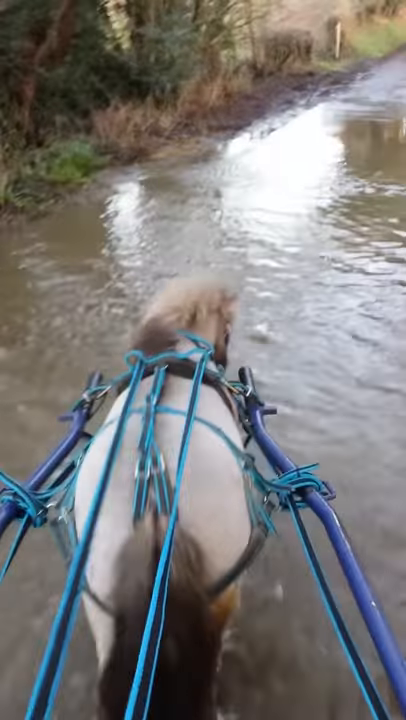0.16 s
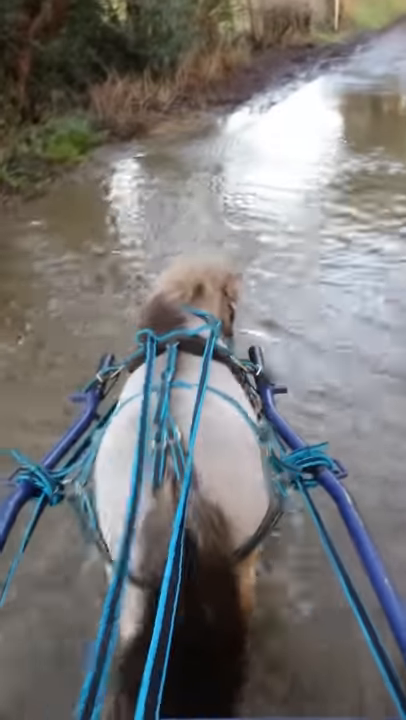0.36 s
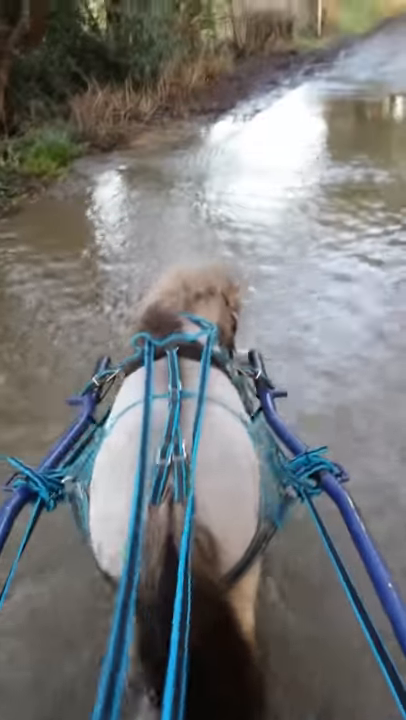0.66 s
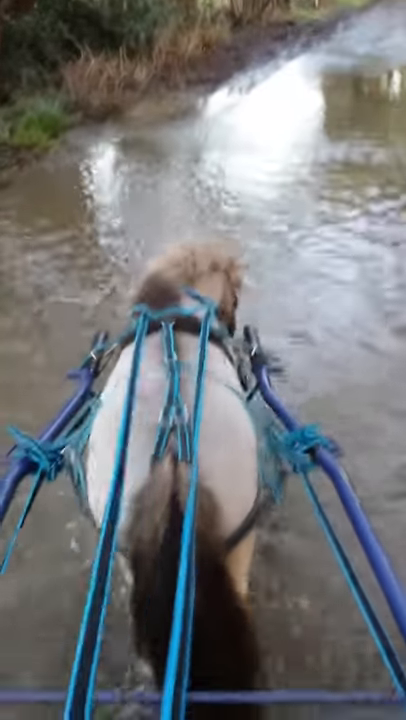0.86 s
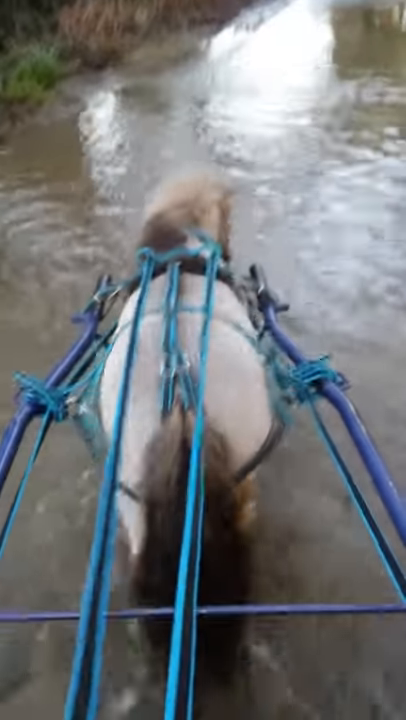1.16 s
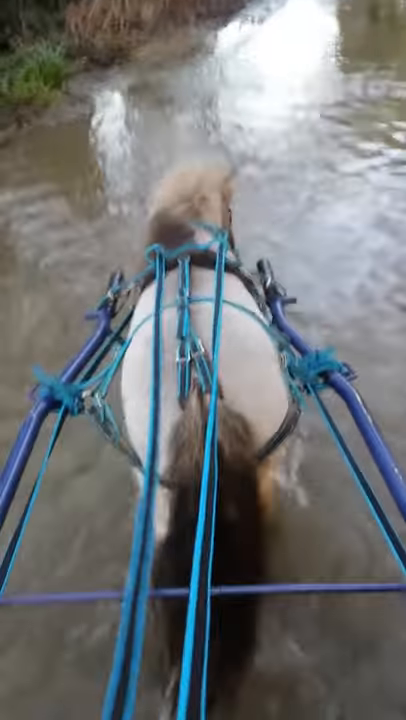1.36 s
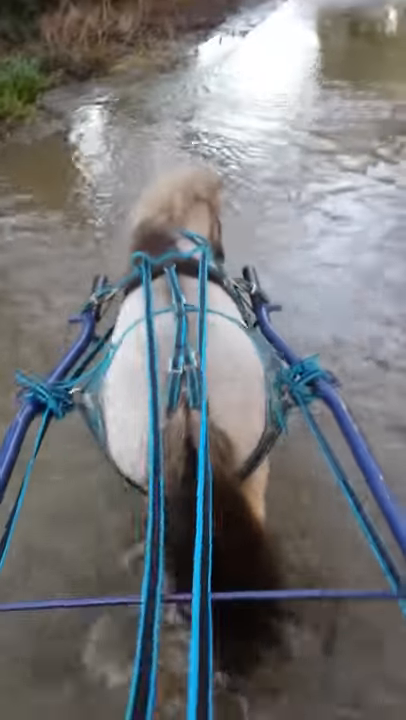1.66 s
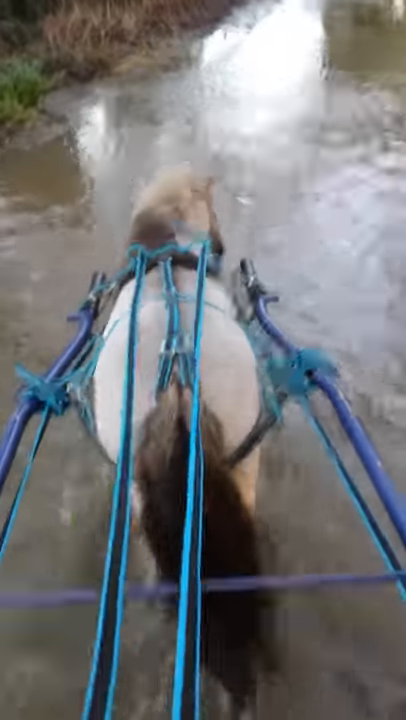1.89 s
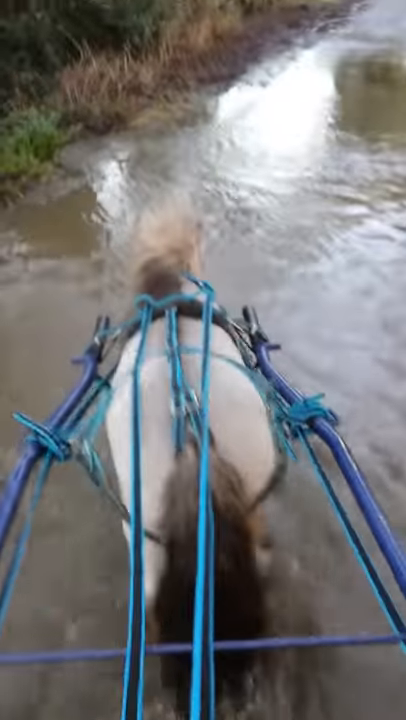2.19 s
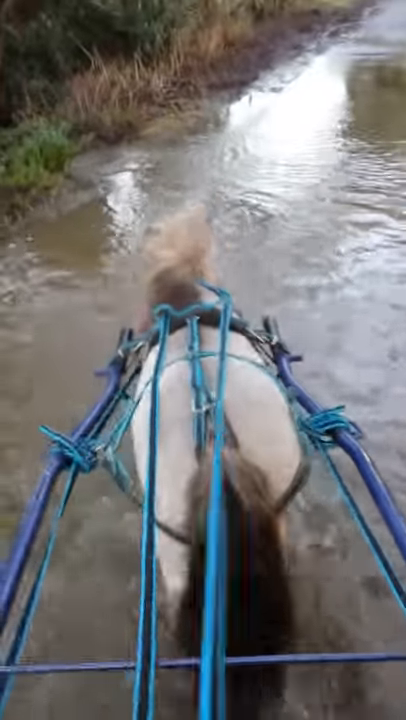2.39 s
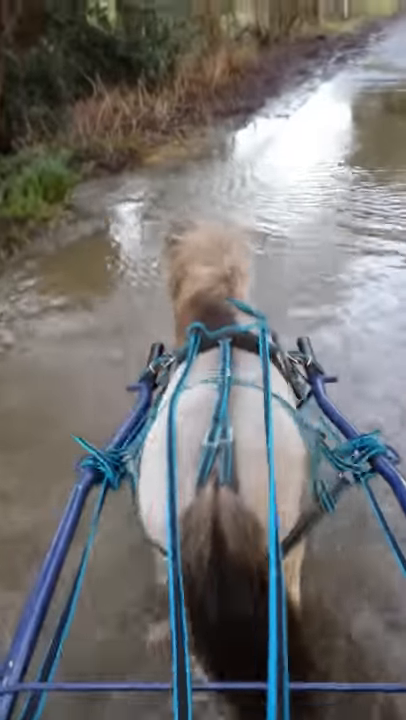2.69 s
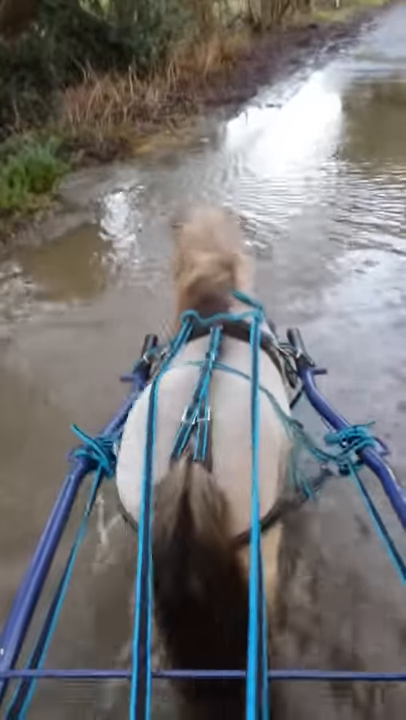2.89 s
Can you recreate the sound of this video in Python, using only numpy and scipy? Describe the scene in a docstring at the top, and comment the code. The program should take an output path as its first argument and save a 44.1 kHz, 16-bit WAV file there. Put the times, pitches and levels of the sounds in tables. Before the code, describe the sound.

Splashing steps of a pony wading through flood water, over steady fizzing wake and wind buffets

```python
"""Pony cart through flood water

A pony trots through flood water pulling a cart, heard from the seat on a phone with two microphones.
Each step throws a splash of lumpy noise and bubbles over the steady fizz of the wake.
Sliding, dying tones make the glugs, thuds and droplets; short noise bursts make the slaps of water.
Filtered noise and deep single swings are the wind, which buffets the right microphone in growing gusts."""
import sys
import numpy as np
from scipy import signal
from scipy.fft import rfft, irfft
from scipy.io import wavfile
from scipy.ndimage import uniform_filter1d

SR = 44100
rng = np.random.default_rng(int(sys.argv[2]) if len(sys.argv) > 2 else 0)


def magnitude_from_level(level_db):
    """Linear magnitude for a level in decibels (20 dB per decade)."""
    exponent = np.asarray(level_db, float) / 20
    return 10 ** exponent


def digitize_waveform(pressure):
    """Quantize a signal to 16-bit integers and store it at the path in sys.argv[1].

    Rows of a 2-D input are taken as channels; values are limited to [-1, 1].
    """
    field = np.atleast_2d(pressure).T
    bounded = np.clip(field, -1, 1)
    quanta = np.round(bounded * 32767).astype(np.int16)
    wavfile.write(sys.argv[1], SR, quanta)


N = 134064  # length in samples

# Colour of the wake's fizz. Each row: frequency in Hz, relative level in dB.
WAKE_COLOUR = [(24, -35), (40, -6.5), (209, 1.5), (416, -18.5), (698, -5), (2450, -9), (3220, -7),
               (5540, -10), (7440, -9), (11900, -27.5), (14500, -41.5)]
# Stereo width of all the noise made by noise(). Each row: frequency in Hz, left-right likeness (1 = same).
STEREO_LIKENESS = [(180, 1), (530, 0.86), (1200, 0.47), (4710, 0.047), (14000, 0.04)]
# Wind rumble on the right port. Each row: time in seconds, level in dB.
WIND_LEVEL = [(1.3, -39), (1.78, -36.5), (1.87, -29.5), (2.14, -33), (2.25, -27.5), (2.41, -31),
              (2.5, -21.5), (2.68, -16.5), (2.78, -25), (2.86, -37)]
# Colour of the wind rumble. Each row: frequency in Hz, relative level in dB.
WIND_COLOUR = [(20, -37), (40, -1), (70, 1.5), (130, -2), (250, -10.5), (400, -14), (1100, -86)]
# Splash of each step. Each row: start in seconds, strength in dB, brightness in dB, fade length in seconds.
STEPS = [(-.002, -28, -4, 0.11), (0.204, -28, 3, 0.11), (0.487, -28, -9, 0.078), (0.684, -30.5, 3, 0.15),
         (0.97, -29, -3.5, 0.079), (1.188, -31.5, 2.5, 0.15), (1.474, -30.5, 0, 0.085),
         (1.694, -26, 2, 0.1), (1.971, -30, -2, 0.069), (2.21, -26.5, -4.5, 0.12), (2.501, -29.5, -2, 0.11),
         (2.62, -30.5, -2, 0.11), (2.708, -27, -3, 0.14), (2.978, -29, -4, 0.2)]
# Colour of the splashes. Each row: frequency in Hz, relative level in dB.
SPLASH_COLOUR = [(150, -5), (350, -9), (650, -4), (1000, -4), (1600, -9), (3500, -16), (7000, -4.5),
                 (10000, -17.5), (15000, -87)]
# Air pockets closing in the water. Each row: time in seconds, peak in dB, pitch in Hz.
GLUGS = [(.004, -24.5, 584), (.017, -19.5, 723), (0.048, -19.5, 574), (0.11, -21, 1130), (0.237, -12, 662),
         (0.292, -19, 578), (0.495, -22.5, 560), (0.532, -27, 545), (0.558, -23, 545), (0.696, -24, 1200),
         (0.725, -19, 620), (.748, -22.5, 840), (0.762, -19.5, 603), (.771, -22.5, 730), (.785, -25, 744),
         (.912, -24, 1430), (1.192, -20.5, 1340), (1.239, -22.5, 742), (1.245, -10.5, 689),
         (1.261, -26, 716), (1.285, -17.5, 730), (1.494, -24.5, 760), (1.719, -20.5, 780),
         (1.731, -15.5, 705), (1.767, -24, 746), (2.215, -23.5, 1210), (2.248, -23, 934), (2.291, -24, 810),
         (2.299, -17.5, 704), (2.514, -22.5, 995), (2.629, -22, 570), (2.745, -19.5, 735),
         (2.804, -21.5, 736), (2.82, -24, 920), (2.993, -22, 1290), (3.0098, -17.5, 943),
         (3.031, -19.5, 726)]
# Thuds of the legs. Each row: time in seconds, peak in dB, pitch in Hz, decay scale in cycles.
THUDS = [(0.056, -14, 216, 2.6), (0.289, -26, 211, 5.3), (0.494, -18.5, 318, 2.8), (0.562, -22.5, 212, 2.2),
         (1.043, -27, 236, 6.5), (1.567, -21, 201, 6.2), (1.774, -20, 235, 3.7), (1.997, -16, 236, 1.33),
         (2.295, -25, 254, 2.6), (2.627, -20, 255, 3.3)]
# Water slapping water. Each row: start in seconds, peak of the crack in dB, centre frequency in Hz.
SLAPS = [(.213, -11, 4000), (.991, -12, 700), (1.2039, -7, 3200), (1.701, -15, 1700), (2.216, -10, 1400),
         (2.628, -18, 1190), (2.71, -11, 2770), (2.7305, -7.5, 2900)]
# Ringing droplets. Each row: time in seconds, cluster level in dB, middle pitch in Hz.
DROPLETS = [(1.164, -14, 4100), (1.181, -16, 7600), (1.203, -12.5, 3780), (1.222, -22, 7060),
            (1.274, -15, 4280), (1.6036, -15, 7060), (1.7853, -8, 6240), (2.788, -23, 2500)]
# Single wind buffets on the right port. Each row: time in seconds, peak in dB, pitch in Hz.
BUFFETS = [(1.466, -13.5, 81.5), (1.846, -9, 76), (1.883, -9.5, 97), (2.014, -14.5, 106),
           (2.219, -12.5, 129), (2.234, -11.5, 159), (2.259, -15, 144), (2.344, -4.5, 134),
           (2.371, -16, 74), (2.537, -7, 115), (2.645, -13, 74.5), (2.669, -12, 155), (2.739, -8, 170),
           (2.761, -4.5, 243)]
# Tonal balance of the two ports for the water. Each row: frequency in Hz, left minus right in dB.
PORT_BALANCE = [(200, 0), (370, 2), (800, -1.5), (1700, -1), (3300, 3), (6000, -4.5), (9200, -12),
                (14000, -25)]


def evened(x):
    """Scales a signal to an rms of 1."""
    return x / np.sqrt(np.mean(x ** 2) + 1e-20)


def read(points, hz):
    """Reads a frequency table at any frequency, on a logarithmic axis."""
    f, value = np.transpose(points)
    return np.interp(np.log(hz + 1), np.log(f + 1), value)


def curve(points):
    """Draws straight lines through (seconds, value) rows, one value per sample."""
    return np.interp(np.arange(N) / SR, *np.transpose(points))


def add(mix, s, sound):
    """Mixes a sound in at s seconds, trimming what falls outside."""
    start = round(s * SR)
    part = mix[max(start, 0):][:len(sound) + min(start, 0)]
    part += sound[max(-start, 0):][:len(part)]


def noise(colour, patchy_db, flicker_db):
    """Two-channel noise from random short-time spectra with patches and wide flicker, rms 1."""
    frames = N // 128 + 5
    hz = np.fft.rfftfreq(512, 1 / SR)
    a, b, c, d, patches = rng.standard_normal((frames, 257, 5)).T
    patches = uniform_filter1d(patches, size=8, axis=0)  # smooth across frequency
    patches = evened(uniform_filter1d(patches, size=6, axis=1))  # and across time
    flicker = evened(uniform_filter1d(rng.standard_normal(frames), size=3))
    same = np.clip(read(STEREO_LIKENESS, hz), -1, 1)[:, None]
    left = a + 1j * b
    right = same * left + np.sqrt(1 - same ** 2) * (c + 1j * d)
    level_db = read(colour, hz)[:, None] + patchy_db * patches + flicker_db * flicker
    spectra = np.array([left, right]) * magnitude_from_level(level_db)
    return evened(signal.istft(spectra, nperseg=512, noverlap=384)[1][:, :N])


def bubble(hz, cycles, glide, rise):
    """A swelling and dying tone, peak near 1, sliding up for a positive glide and down for a negative."""
    u = np.arange(0, 1.5 * cycles / hz, 1 / SR) * hz / cycles  # time in units of the decay scale
    shape = u / (u + rise) * np.exp(-1.2 * u) * (1 - (u / u[-1]) ** 2)
    phase = cycles * (u + glide * (u ** 2 / 2 - u / 2))  # in turns
    return shape / shape.max() * np.sin(2 * np.pi * phase)


def swarm(per_s, lo_hz, hi_hz, cycles, spread_db, width):
    """Random bubbles of 24 sizes, so 24 pitches, scattered left and right."""
    out = np.zeros((2, N))
    for hz in np.geomspace(lo_hz, hi_hz, num=24):
        draw = rng.random((2, N))
        size = np.minimum(rng.exponential(1, N), 4)
        train = (draw[0] < per_s / 24 / SR) * magnitude_from_level(spread_db * size)
        side = width * (2 * draw[1] - 1)
        panned = train * np.array([1 + side, 1 - side])
        out += signal.oaconvolve(panned, bubble(hz, cycles, 0.037, 0.03)[None], axes=1)[:, :N]
    return out


def wake():
    """Wheels and legs stir a steady fizz: noise, fine spray and small bubbles."""
    fizz = magnitude_from_level(-31) * noise(WAKE_COLOUR, 1.56, 1.0)
    spray = magnitude_from_level(-52.0) * swarm(900, 2270, 10200, 2.7, 4.14, 0.99)
    gurgle = magnitude_from_level(-47.0) * swarm(130, 193.8, 1746, 10.5, 3.7, 0.58)
    return fizz + spray + gurgle


def wind_rumble():
    """Wind over the ports: low noise in slow lumps, nearly all on the right."""
    white = rng.standard_normal((2, N))
    lumps = uniform_filter1d(rng.standard_normal((2, N)), size=500)
    lumps = evened(uniform_filter1d(lumps, size=500))
    colour = magnitude_from_level(read(WIND_COLOUR, np.fft.rfftfreq(N, 1 / SR)))
    rumble = evened(irfft(rfft(white * magnitude_from_level(2.6 * lumps)) * colour, N))
    left_level = magnitude_from_level(-50.5) * np.ones(N)
    return rumble * np.array([left_level, magnitude_from_level(curve(WIND_LEVEL))])


def splashes():
    """Each step: a burst of lumpy noise that fades, the top sooner, with a swarm of bubbles inside."""
    rise_s, split_hz = 0.0074, 1500
    body, top = np.zeros((2, N))  # envelopes below and above the split
    for s, strength_db, bright_db, length in STEPS:
        t = np.arange(0, 1.4 * length, 1 / SR)
        rise = np.minimum(t / rise_s, 1)
        add(body, s, rise * magnitude_from_level(strength_db - 4 * (t / length) ** 3.8))
        add(top, s, rise * magnitude_from_level(strength_db + bright_db - 15 * t / length))
    water = noise(SPLASH_COLOUR, 3.6, 3.2)
    low = signal.sosfilt(signal.butter(4, split_hz, fs=SR, output="sos"), water)
    high = signal.sosfilt(signal.butter(4, split_hz, "high", fs=SR, output="sos"), water)
    large_bubbles = magnitude_from_level(-11) * swarm(300, 507, 1630, 5.1, 5.3, 0.37)
    small_bubbles = magnitude_from_level(-5.5) * swarm(1800, 2447, 9100, 5.0, 3.86, 1.0)
    return body * (low + large_bubbles) + top * (high + small_bubbles)


def glugs():
    """Single air pockets ring hollow; a smaller pocket rings along and beats with each."""
    cycles, partner_db = 6.14, -10
    out = np.zeros(N)
    for (s, db, hz), (late, size) in zip(GLUGS, rng.random((len(GLUGS), 2))):
        partner_hz = hz * (1.304 + 0.5 * size)
        add(out, s - 0.001, magnitude_from_level(db) * bubble(hz, cycles, 0.028, 0.073))
        add(out, s + 0.00315 * late, magnitude_from_level(db + partner_db) * bubble(partner_hz, cycles, 0.04, 0.19))
    return out


def thuds():
    """Deep thuds of the legs: low tones that die within a few cycles."""
    out = np.zeros(N)
    for s, db, hz, cycles in THUDS:
        add(out, s + 0.00148, magnitude_from_level(db) * bubble(hz, cycles, 0.033, 0.15))
    return out


def slaps():
    """Brief cracks two octaves wide with a longer puff of spray, partly alike in both ports."""
    crack_t60_s, spray_t60_s, spray_db = 0.009, 0.035, -11
    t = np.arange(0, spray_t60_s, 1 / SR)

    def puff(burst, band_hz, t60_s):
        """Dies away by 60 dB in t60_s and is band-passed to a peak of 1."""
        band = signal.butter(3, band_hz, "band", fs=SR, output="sos")
        x = signal.sosfilt(band, burst * magnitude_from_level(-60 * t / t60_s))
        return x / abs(x).max()

    out = np.zeros((2, N))
    for s, db, hz in SLAPS:
        left, right, both = rng.standard_normal((3, len(t)))
        burst = np.minimum(t / 0.00072, 1) * (np.array([left, right]) + 0.48 * both)
        crack = puff(burst, [hz / 2, hz * 2], crack_t60_s)
        spray = puff(burst, [4500, 8800], spray_t60_s)
        for channel, part in zip(out, crack + magnitude_from_level(spray_db) * spray):
            add(channel, s, magnitude_from_level(db) * part)
    return out


def droplets():
    """Clusters of three ringing droplets, close in time and pitch."""
    out = np.zeros(N)
    for (s, db, hz), draw in zip(DROPLETS, rng.random((len(DROPLETS), 3, 2))):
        for late, size in draw:
            ring = bubble(hz * (0.92 + 0.16 * size), 9.0, 0.1, 0.15)
            add(out, s + 14 * late / hz, magnitude_from_level(db - 3) * ring)  # up to 14 cycles late
    return out


def wind_buffets():
    """Single gusts punch the right port: deep swings that slide down and die at once."""
    out = np.zeros((2, N))
    for s, db, hz in BUFFETS:
        add(out[1], s + 0.0019, magnitude_from_level(db) * bubble(hz, 1.1, -0.84, 0.067))
    return out


def through_ports(water):
    """The two ports colour the water differently, and it reaches the right one slightly later."""
    right_lag_s = 7e-5
    hz = np.fft.rfftfreq(N, 1 / SR)
    tilt = read(PORT_BALANCE, hz) / 2  # half the difference up on the left, half down on the right
    lag = np.exp(-2j * np.pi * hz * right_lag_s)
    return irfft(rfft(water) * np.array([magnitude_from_level(tilt), lag * magnitude_from_level(-tilt)]), N)


def scene():
    """Water through both ports, with wind straight on the microphones."""
    pockets = glugs() + thuds() + droplets()  # the same in both channels
    water = wake() + splashes() + slaps() + pockets
    return through_ports(water) + wind_rumble() + wind_buffets()


def band_limit(x):
    """A steep low-pass at the top of the band."""
    return signal.sosfilt(signal.butter(12, 14630, fs=SR, output="sos"), x)


def record(dry):
    """The microphones lose the deepest bass, and the treble is cut off at 14.6 kHz."""
    bass_cut = signal.butter(2, 40, "high", fs=SR, output="sos")
    treble_cut = signal.firwin(255, 14600, fs=SR)[None]
    mix = signal.oaconvolve(signal.sosfilt(bass_cut, dry), treble_cut, "same", axes=1)
    return band_limit(mix)


dry = scene()
out = record(dry)
digitize_waveform(out)
```